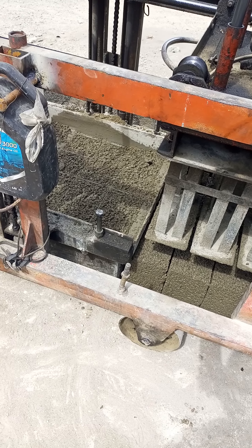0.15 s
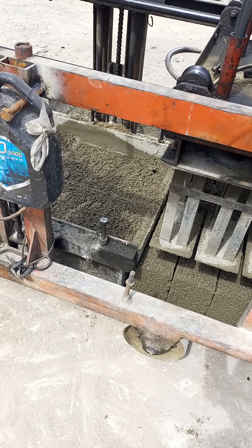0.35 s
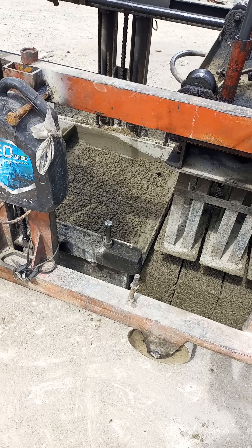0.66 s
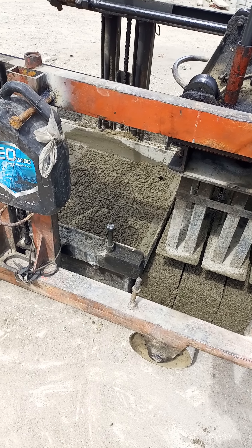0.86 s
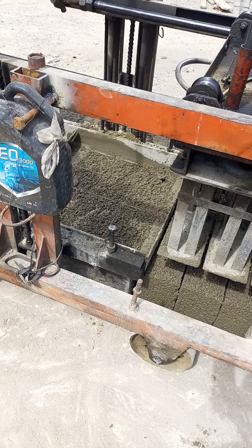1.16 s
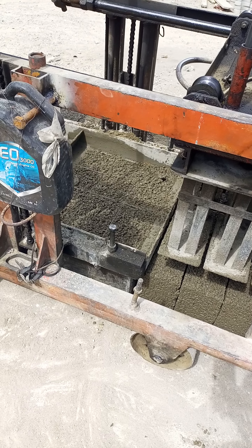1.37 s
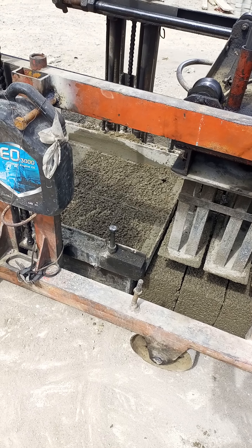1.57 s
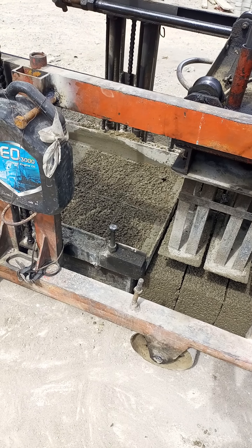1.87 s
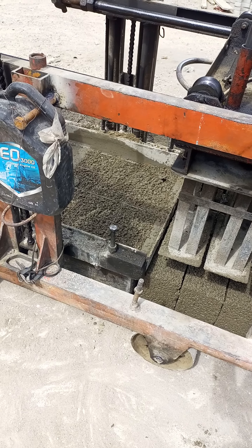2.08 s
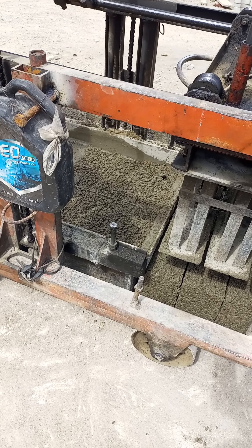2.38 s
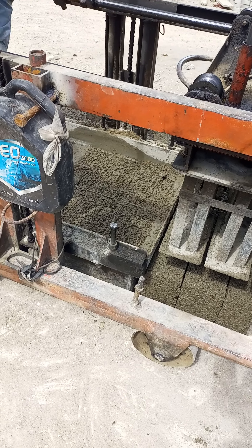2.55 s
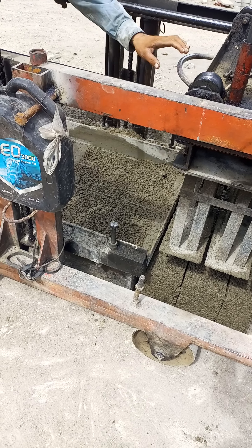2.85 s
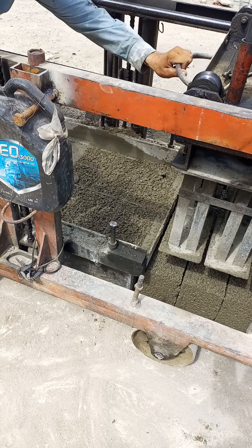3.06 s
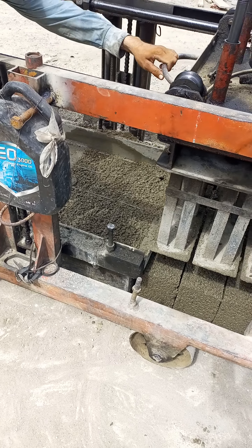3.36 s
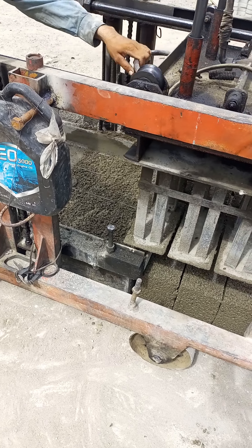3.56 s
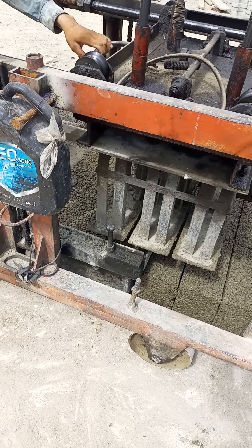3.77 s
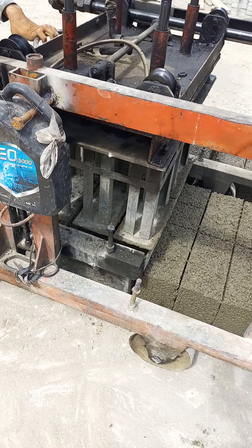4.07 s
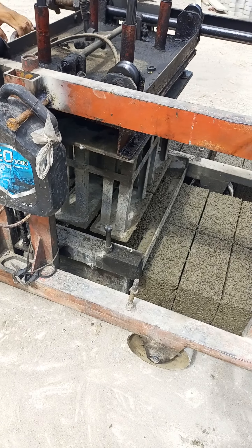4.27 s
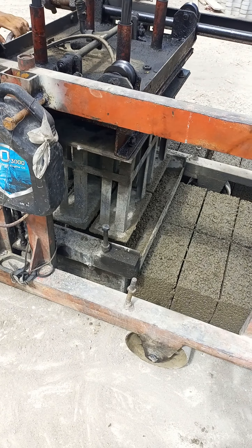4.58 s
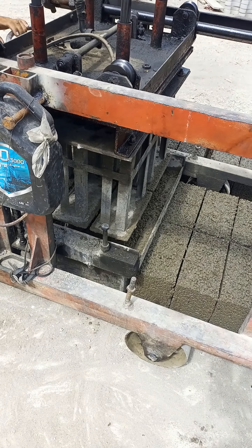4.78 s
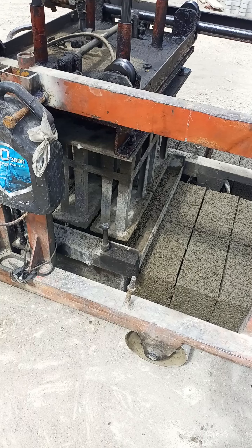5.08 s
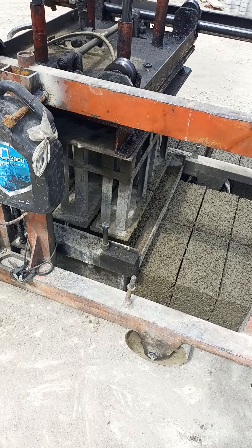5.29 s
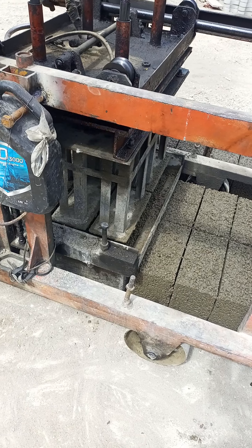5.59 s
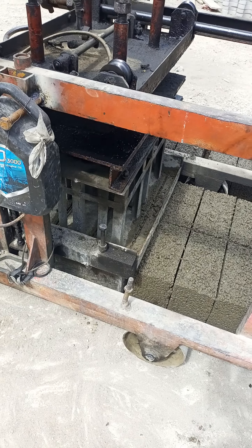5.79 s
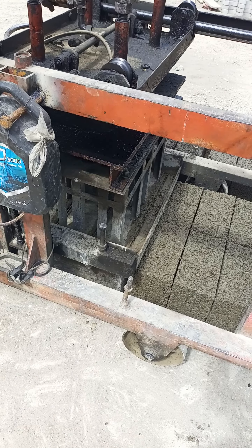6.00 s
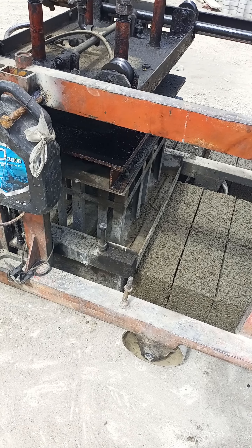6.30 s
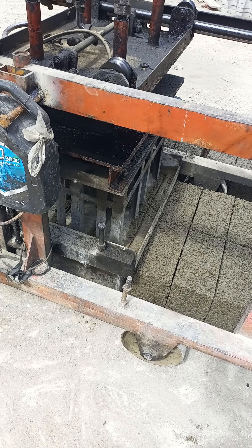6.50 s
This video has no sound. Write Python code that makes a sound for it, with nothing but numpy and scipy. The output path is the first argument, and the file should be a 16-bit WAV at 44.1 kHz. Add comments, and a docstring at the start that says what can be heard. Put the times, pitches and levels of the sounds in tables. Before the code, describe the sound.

A small engine putters and clatters nearby in the open air while a shovel strikes a steel mould and shoves wet, gravelly concrete around. A few sharp clanks follow, then a stretch of plain idling and a quick clatter of heavy steel. Near the end the engine races and the whole block machine vibrates, droning and rattling loudly. A heavy tamper lands with a thud and a clang, and the shaking continues, a little damped.

```python
"""A single-cylinder engine idles on a concrete block machine outdoors: exhaust puffs, valve gear clacks.
A shovel knocks and pushes wet mix into the ringing steel mould; the tamper head is freed and rolled over.
The throttle opens, a belt-driven vibrator shakes the whole frame, and the head drops onto the mix,
damping the shaking. Most sounds are modelled as source and filter: a force or a gas pulse excites
the resonances of a steel part or of the exhaust."""
import sys
import numpy as np
from scipy import signal
from scipy.fft import rfft, irfft
from scipy.io import wavfile

SR = 44100
rng = np.random.default_rng(int(sys.argv[2]) if len(sys.argv) > 2 else 0)


def wav_record(signal):
    """Record a signal, one row per channel, as 16-bit PCM in the file named by sys.argv[1]."""
    frames = np.transpose(np.atleast_2d(signal))
    bounded = np.clip(frames, -1, 1)
    # unit amplitude maps onto the largest positive 16-bit level
    quanta = np.round(bounded * 32767).astype(np.int16)
    wavfile.write(sys.argv[1], SR, quanta)


N = 292824
TIME = np.arange(N) / SR

# Spectra give relative power density; their modes add resonance peaks.
# drifting idle: t/s, firing rate/Hz
IDLE_RATE = [(0, 11.586), (1.45, 12.083), (1.9, 11.46), (3.2, 11.836), (4.8, 11.697)]
# vibrator's drag as the belt grips, then as the head drops onto the mix: t/s, build-up/s, firing rate lost/Hz
VIBRATOR_DRAG = [(4.9395, .3727, 10.89), (5.383, .44, 7.646)]
# a puff at the firing and a weaker one later: phase/cycles, level/dB, decay/cycles
EXHAUST_PUFFS = [(0.98, -4.5, 0.014), (0.1, -12, 0.085)]
# exhaust spectrum: f/Hz, level/dB
EXHAUST_SPECTRUM = [(25, -67), (50, -27), (110, 2), (220, -3.5), (300, -10.5), (500, -67)]
# clacks of piston and valve gear: phase/cycles, level/dB, decay/cycles
VALVE_CLACKS = [(0.018, -8, 0.21), (.28, -10, 0.18), (.39, -10, 0.26), (0.579, -17, 0.061)]
# valve gear spectrum: f/Hz, level/dB
GEAR_SPECTRUM = [(250, -25), (560, -9), (830, -18), (1390, -4), (1720, -9.5), (2500, -4.5), (4400, -7.5),
                 (7400, -24.5), (10000, -14.5), (12000, -30)]
# engine block resonances: f/Hz, width/Hz, level/dB
BLOCK_MODES = [(1396, 63, 3.5), (2260, 370, 2.5)]
# pings of the engine covers: f/Hz, width/Hz, level/dB
COVER_MODES = [(2565, 51, -50), (3484, 120, -53.5), (4326, 38, -58.5)]
# open-air background: f/Hz, level/dB
YARD_SPECTRUM = [(25, -14), (80, -43), (400, -6.5), (3000, -12.5), (16000, -23.5)]

# shovel blade on the mould: t/s, level/dB, contact/s, main ring f/Hz, its lift/dB
SHOVEL_KNOCKS = [(.5395, -21, 0.0043, 1010, 7.5), (.553, -30.5, 0.0084, 506, 11),
                 (.787, -28.5, 0.0083, 4400, 14), (1.2195, -25.5, 0.0039, 1570, 19),
                 (1.222, -21.5, 0.002, 5200, 15), (1.883, -24.5, 0.01, 2790, 1),
                 (1.9075, -16, 0.0038, 2280, -1.5), (2.296, -30.5, 0.011, 5260, 24),
                 (2.319, -26.5, 0.0064, 3300, 12)]
# steel struck through wet mix: f/Hz, level/dB
SHOVEL_SPECTRUM = [(40, -48), (100, -27), (340, 9), (700, 3), (1200, -6.5), (2300, -2), (3800, -5.5),
                   (6300, -10.5), (8000, -15.5), (13000, -30)]
# blade resonances: f/Hz, width/Hz, level/dB
SHOVEL_MODES = [(354, 64, -2), (875, 290, 14.5), (1460, 140, 13.5), (2180, 195, 19.5), (2535, 270, 16),
                (3230, 91, 8.5), (4510, 170, 10), (4990, 51, 11), (5320, 240, 5.5), (6230, 130, 5.5)]
# mix moved by shovel or head: t/s, length/s, thud level/dB, thud f/Hz, its lift/dB, T60/s, scrape level/dB
MIX_PUSHES = [(0.682, 0.073, -46.5, 460, 10, 0.4, -48.5), (0.782, 0.051, -31, 217, 14, 0.28, -44),
              (1.381, 0.074, -45.5, 820, 24, .15, -52), (1.499, 0.089, -36, 300, 9, 0.15, -46),
              (2.196, 0.082, -25.5, 223, 3, 0.35, -33), (2.296, 0.0078, -26.5, 680, 6, 0.29, -22),
              (4.292, 0.056, -28.5, 244, 12.5, 0.35, -54), (5.743, 0.015, -21.5, 244, 12, 0.21, -48)]
# thud of the mix: f/Hz, level/dB
THUD_SPECTRUM = [(40, -34), (90, -7.5), (200, 1), (850, -4), (1200, -22.5), (6000, -66)]
# scrape of its gravel: f/Hz, level/dB
GRAVEL_SPECTRUM = [(300, -11), (1000, -4.5), (6500, -4.5), (8000, -14.5), (10300, -15), (12500, -26)]
# ringing of the mould's walls: t/s, f/Hz, level/dB, T60 before smothering/s
WALL_RINGS = [(1.596, 567, -20.5, 0.13), (1.596, 432, -39.5, 0.99), (2.609, 434, -33.5, 1),
              (2.891, 438, -45, 1), (5.752, 680, -20.5, 0.22)]
# clanks of the head's catch: t/s, level/dB, contact/s, main ring f/Hz, its lift/dB
CATCH_CLANKS = [(2.6065, -19.5, 0.0071, 560, -5), (2.7425, -21.5, 0.002, 2840, 9.5),
                (2.8905, -28.5, 0.0066, 2880, 18)]
# spectrum of the catch: f/Hz, level/dB
CATCH_SPECTRUM = [(50, -44), (200, -10.5), (450, -7), (900, -5.5), (1150, -10), (2700, -5.5), (6000, -22),
                  (8000, -37), (16000, -40)]
# its resonances: f/Hz, width/Hz, level/dB
CATCH_RESONANCES = [(572, 54, 12.5), (2400, 200, 1.5), (2700, 220, 4), (3700, 74, 3), (4250, 87, 2.5),
                    (4670, 90, 0.5), (5800, 160, -5)]
# tamper head on the frame, and at 4.826 s a brief chatter of the throttle lever: t/s, level/dB, contact/s, main
# ring f/Hz, its lift/dB
HEAD_BLOWS = [(4.287, -27.5, 0.011, 2300, 8), (4.301, -25.5, 0.02, 1590, 16), (4.324, -23, 0.018, 2050, 9),
              (4.356, -25, 0.017, 1650, 10), (4.427, -24.5, 0.0034, 2170, 10),
              (4.826, -37.5, 0.048, 2880, 3), (5.742, -20.5, 0.031, 2103, 2)]
# spectrum of the steel frame: f/Hz, level/dB
FRAME_SPECTRUM = [(400, -32), (950, -5), (1300, -0.5), (1600, -4.5), (2000, 0.5), (6500, -3), (7700, -13.5),
                  (9900, -16), (12500, -32)]
# its resonances: f/Hz, width/Hz, level/dB
FRAME_MODES = [(1853, 18, -1), (2290, 110, -13), (2580, 180, -3.5), (2903, 61, -6), (3243, 140, -8)]

# crack of a firing under throttle: f/Hz, level/dB
CRACK_SPECTRUM = [(400, -64), (2000, -37), (6000, 3), (9500, 13.5), (12000, 3.5)]
# silencer resonance: f/Hz, width/Hz, level/dB
SILENCER_MODES = [(105.5, 1.4, 18)]
# exhaust under load: f/Hz, level/dB
BARK_SPECTRUM = [(50, -33.5), (190, 9.5), (420, 0.5), (1200, -23)]
# the belt slips more at speed: t/s, turns of the vibrator's weight per firing
BELT_RATIO = [(5.9, 2.65), (6.4, 2.618)]
# hum of the shaken machine: harmonic of the vibrator's rate, level/dB
HUM_HARMONICS = [(1, -3), (2, -0.5), (3, 8), (16, -1)]
# spectrum of the filled mould: f/Hz, level/dB
MOULD_SPECTRUM = [(45, -25.5), (75, -8), (130, -2), (200, -0.5), (330, -8.5), (560, -1.5), (800, 0.5),
                  (1200, -5.5), (2000, -12)]
# its resonances: f/Hz, width/Hz, level/dB
MOULD_MODES = [(232, 21, 1.5), (393, 70, -1), (552, 42, 3)]
# loose fittings: f/Hz, width/Hz, level/dB, firing rate that shakes each most/Hz
FITTING_MODES = [(5190, 90, -45.5, 19.5), (5890, 96, -43.5, 19), (3225, 85, -25.5, 41),
                 (2556, 76, -27, 41.5), (4090, 170, -30, 37.6), (4950, 39, -34.5, 38.5),
                 (5750, 16, -33, 43), (6200, 120, -31.5, 34.6)]
# microphone's dips and airy peak: f/Hz, half width/Hz, gain/dB
MICROPHONE_BANDS = [(3780, 97, -4.5), (7970, 950, -2), (12900, 2100, -2), (15350, 650, 7.5)]

THROTTLE_S, REV_GAIN_HZ, REV_LAG_S = 4.835, 63.59, 1.378  # opening; unloaded gain in firing rate; lag
REFERENCE_HZ = 16  # firing rate from which level changes per octave are counted
LANDING_S, SETTLE_S, DAMPING_DB = 5.824, 0.24, -4  # the head settles on the mix and damps the shaking


def amp(db):
    """Amplitude ratio of a level in decibels."""
    return 10 ** (np.asarray(db) / 20)


def unit(x):
    """Normalisation to rms 1."""
    return x / np.sqrt(np.mean(x ** 2) + 1e-20)


def curve(rows, at=TIME):
    """Linear interpolation in a two-column table."""
    return np.interp(at, *np.transpose(rows))


def ramp(start_s, length_s):
    """Linear rise from 0 to 1."""
    return np.clip((TIME - start_s) / length_s, 0, 1)


def wander(rate_hz, size=N):
    """Smooth random modulation of rms about 1."""
    return np.interp(np.arange(size) / SR * rate_hz, np.arange(4096), rng.standard_normal(4096))


def grains(spread_db):
    """Contact noise: a dense rain of tiny impacts of unequal size."""
    noise = rng.standard_normal(N)
    sizes = np.clip(rng.standard_normal(N // 16 + 1), -2, 2)
    return unit(noise * amp(spread_db * np.repeat(sizes, 16)[:N]))


def body(spectrum, modes=(), bed_db=0, lift=(1000, 0), size=8192):
    """Minimum-phase impulse response of energy 1: a broad bed, modal peaks and one lifted region."""
    hz = np.fft.rfftfreq(size, 1 / SR) + 1
    f, db = np.transpose(spectrum)
    power = amp(np.interp(np.log(hz), np.log(f), db) + bed_db) ** 2
    for centre, width, level in modes:
        power = power + amp(level) ** 2 / (1 + 2 * ((hz - centre) / width) ** 2) ** 2
    lift_db = lift[1] / (1 + (np.log(hz / lift[0]) / 0.14) ** 2)
    # towards the treble, small steel modes crowd together and ripple the response
    ripple = np.clip(rng.standard_normal(400), -1.7, 1.4)
    ripple_db = np.minimum(hz / 400, 5.8) * np.interp(np.sqrt(hz) * 2.6, np.arange(400), ripple)
    power = power * amp(lift_db + ripple_db) ** 2
    log_gain = np.log(np.r_[power, power[-2:0:-1]]) / 2
    response = np.fft.ifft(np.exp(np.conj(signal.hilbert(log_gain)))).real[:size // 2]
    return response / np.linalg.norm(response)


def through(x, response):
    """Linear filtering by convolution with an impulse response."""
    return signal.oaconvolve(x, response)[:len(x)]


def add(mix, start_s, sound):
    """Superposition of a sound on the mix."""
    part = mix[round(start_s * SR):][:len(sound)]
    part += sound[:len(part)]


def ring(force, hz, width):
    """Forced resonance: one steel mode driven by a noisy force, rms 1."""
    pole = np.exp((2j * np.pi * hz - 2 * np.pi * width) / SR)
    return unit(signal.lfilter([1], np.poly([pole, pole]), force * rng.standard_normal(N)).real)


def loose_parts(force, spectrum, modes=(), bed_db=0, count=3):
    """Energy sharing: loose parts take turns in catching the force, each with its own response."""
    shares = amp([9 * wander(16) for _ in range(count)])
    shares = shares / np.linalg.norm(shares, axis=0)
    return sum(through(force * share * grains(2.9), body(spectrum, modes, bed_db)) for share in shares)


def firing_rate():
    """First-order lag: the engine races up from idle against the vibrator's drag; rate in Hz."""
    rev = REV_GAIN_HZ * (1 - np.exp(-np.maximum(TIME - THROTTLE_S, 0) / REV_LAG_S))
    drag = sum(lost * ramp(start, length) for start, length, lost in VIBRATOR_DRAG)
    return curve(IDLE_RATE) + rev - drag


def engine(cycles):
    """Periodic excitation: each cycle puffs gas from the exhaust, clacks the gear and pings the covers."""
    firing = cycles.astype(int)
    count = firing[-1] + 1
    puff_scatter, gear_scatter = rng.standard_normal((count, 2))[firing].T
    puffs = sum(amp(db) * np.exp(-((cycles - at) % 1) / decay) for at, db, decay in EXHAUST_PUFFS)
    flow = (amp(-26.5) + puffs) * amp(2 * puff_scatter) * (rng.standard_normal(N) + 0.17)
    exhaust = through(flow, body(EXHAUST_SPECTRUM))
    slack = cycles + 0.011 * wander(40)  # play in the gear shifts each clack a little
    gear = amp(-13) + sum(amp(db + wander(16)) * np.exp(-((slack - at) % 1 / decay) ** 2)
                          for at, db, decay in VALVE_CLACKS)
    gear_force = gear * amp(0.5 * gear_scatter + 2 * wander(200))
    clatter = loose_parts(gear_force, GEAR_SPECTRUM, BLOCK_MODES, bed_db=3.5)
    pings = sum(amp(db) * ring(gear ** 2 * amp(1.7 * rng.standard_normal(count))[firing], hz, width)
                for hz, width, db in COVER_MODES)
    return amp(-54.5) * unit(exhaust) + amp(-42.5) * unit(clatter) + pings


def yard():
    """Stationary filtered noise: the faint open-air background."""
    return amp(-56) * through(rng.standard_normal(N), body(YARD_SPECTRUM))


def contact(length_s, t60, rise_s, spread_db, size=20000):
    """Chattering contact: a random force rises, holds and decays exponentially."""
    t = np.arange(size) / SR
    force = rng.standard_normal(size) * amp(spread_db * np.tanh(wander(868, size)))
    return unit(force) * np.minimum(t / rise_s, 1) * amp(-60 * np.maximum(t - length_s, 0) / t60)


def blows(rows, spectrum, modes, bed_db, t60, tail_db, tail_t60, spots=4, strike_s=0.00198):
    """Impact of steel on steel: strike, chatter, faint rattle; the place struck favours certain modes."""
    out = np.zeros(N)
    for start, db, length, hz, lift_db in rows:
        chatter = contact(length, t60, rise_s=0.00023, spread_db=1.5)
        rattle = contact(length, tail_t60, rise_s=0.00023, spread_db=1.5)
        force = chatter + amp(tail_db) * rattle
        high_spots = (rng.random(spots) * strike_s * SR).astype(int)  # the edge lands on these first
        force[high_spots] += amp(11.5) * rng.choice([-1, 1], spots)
        add(out, start, amp(db) * through(force, body(spectrum, modes, bed_db, (hz, lift_db))))
    return out


def shovel():
    """Impacts on the mould excite the modes of the blade."""
    return blows(SHOVEL_KNOCKS, SHOVEL_SPECTRUM, SHOVEL_MODES,
                 bed_db=8, t60=0.032, tail_db=-10, tail_t60=0.26)


def wet_mix():
    """Damped impact and friction: heavy mix thuds in the mould as its gravel scrapes the steel."""
    out, gravel = np.zeros(N), body(GRAVEL_SPECTRUM)
    for start, length, thud_db, hz, lift_db, t60, scrape_db in MIX_PUSHES:
        push = contact(length, t60, rise_s=0.017, spread_db=5.5)
        scrape = contact(length, t60 / 2, rise_s=0.0017, spread_db=3)
        thud = through(push, body(THUD_SPECTRUM, lift=(hz, lift_db)))
        add(out, start, amp(thud_db) * thud + amp(scrape_db) * through(scrape, gravel))
    return out


def mould_walls(rise_s=0.0044, smothered_s=0.26):
    """Free vibration: struck walls ring on unsteadily until the settling mix smothers them."""
    out, t = np.zeros(N), np.arange(SR) / SR
    envelope = np.minimum(t / rise_s, 1) * np.maximum(1 - (t / smothered_s) ** 4, 0)
    for start, hz, db, t60 in WALL_RINGS:
        waver = wander(74.5, SR)
        tone = np.sin(2 * np.pi * hz * t + 0.67 * waver)
        add(out, start, amp(db - 60 * t / t60 + 2 * waver) * envelope * tone)
    return out


def head_catch():
    """Impacts excite the modes of the catch as the head is freed."""
    return blows(CATCH_CLANKS, CATCH_SPECTRUM, CATCH_RESONANCES,
                 bed_db=1.5, t60=0.1, tail_db=-10, tail_t60=0.13)


def tamper_head():
    """Impacts of the rolling, then dropping, head, and a brief chatter of the throttle lever, excite the modes
    of the frame."""
    return blows(HEAD_BLOWS, FRAME_SPECTRUM, FRAME_MODES, bed_db=-8, t60=0.088, tail_db=-6, tail_t60=0.21)


def throttle(cycles, rate, crack_s=0.0017, crack_delay_s=0.00094, thump_s=0.0032):
    """Pressure pulses: with more fuel each firing cracks and drives a slug of gas through the silencer."""
    octaves = np.log2(rate / REFERENCE_HZ)
    since_s = ((cycles + 0.5) % 1 - 0.5) / rate  # from the nearest firing
    pulse = np.exp(-((since_s - crack_delay_s) / crack_s) ** 2)
    fizz = amp(-31.5 + 10.5 * octaves)  # fills the gaps as the engine races
    crack_db = -23.5 - 2.5 * octaves + 2 * wander(120)
    crack = loose_parts(amp(crack_db) * (pulse + fizz), CRACK_SPECTRUM)
    thump = through(np.exp(-(since_s / thump_s) ** 2), body(EXHAUST_SPECTRUM, SILENCER_MODES))
    return ramp(THROTTLE_S, 0.0034) * (crack + amp(-47 - 8.5 * octaves) * unit(thump))


def shaking_db(rate, level_db, db_per_octave, full_s, build_db_per_s):
    """Level of forced vibration: it builds as the belt grips, follows speed and is damped by the head."""
    build_up_db = build_db_per_s * np.minimum(TIME - full_s, 0)
    speed_db = db_per_octave * np.log2(rate / REFERENCE_HZ)
    return level_db + build_up_db + speed_db + DAMPING_DB * ramp(LANDING_S, SETTLE_S)


def exhaust_bark(cycles, rate, decay_s=0.0087):
    """Pulsed flow noise: under load each firing is a heavy, breathy thump."""
    puff = np.exp(-(cycles % 1) / rate / decay_s) * (rng.standard_normal(N) + 0.25)
    bark = unit(through(puff / np.sqrt(rate), body(BARK_SPECTRUM)))
    level_db = shaking_db(rate, level_db=-32, db_per_octave=-6.5, full_s=5.39, build_db_per_s=40)
    return ramp(THROTTLE_S, 0.42) * amp(level_db) * bark


def vibrator(cycles, rate, slam_decay_turns=0.31):
    """Rotating unbalance: a belt-driven weight slams the mould once a turn and rattles the frame."""
    turns = np.cumsum(rate * curve(BELT_RATIO)) / SR
    slam = amp(1) + np.exp(-(turns % 1) / slam_decay_turns)  # some rattle persists between slams
    throb = unit(slam * amp(1.27 * wander(100)))
    rattle_db = shaking_db(rate, level_db=-28, db_per_octave=9.5, full_s=5.425, build_db_per_s=34)
    rattle = loose_parts(amp(rattle_db) * throb, FRAME_SPECTRUM, FRAME_MODES, bed_db=-6.5, count=2)
    grip = ramp(THROTTLE_S, 0.22)
    return grip * (rattle + fittings(throb, rate) + mould_hum(cycles, turns, throb, rate))


def fittings(throb, rate, swell_db=3, span_octaves=0.26):
    """Resonance: each loose fitting rings in swells as the speed passes the one that shakes it most."""
    out = np.zeros(N)
    for hz, width, db, best_rate in FITTING_MODES:
        nearness = np.exp(-(np.log2(rate / best_rate) / span_octaves) ** 2)
        out += amp(db) * nearness * ring(throb * amp(swell_db * wander(14)), hz, width)
    return out


def harmonics(turns, orders, levels_db, swell_db=3, jitter_turns=0.0053):
    """Harmonic series of a rotation: each partial swells alone; phase jitter roughens the higher ones."""
    return sum(amp(db + swell_db * wander(10))
               * np.cos(2 * np.pi * (k * turns + rng.random() + k * jitter_turns * wander(50)))
               for k, db in zip(orders, levels_db))


def mould_hum(cycles, turns, throb, rate, engine_db=1.5, dull_hz=450):
    """Forced vibration: harmonics of weight and engine swell as they climb through the mould's modes."""
    orders = np.arange(1, 21)
    drone = harmonics(turns, orders, curve(HUM_HARMONICS, orders))
    drone += harmonics(cycles, orders, np.full(len(orders), engine_db))
    walls = body(MOULD_SPECTRUM, MOULD_MODES)
    rumble = through(throb ** 3 * grains(0.81), walls)
    hum = amp(-2.5) * unit(through(drone, walls)) + amp(-5.5) * unit(rumble)
    hum_db = shaking_db(rate, level_db=-33, db_per_octave=8.5, full_s=5.228, build_db_per_s=59)
    # gentle shaking is dull; the upper harmonics come once the mould starts to hammer
    dull = signal.sosfiltfilt(signal.butter(2, dull_hz, fs=SR, output="sos"), hum)
    hammering = np.clip((hum_db + 34.5) / 6, 0, 1)
    return amp(hum_db) * (dull + hammering * (hum - dull))


def scene():
    """Superposition of all sources in mono; the engine's phase is the integral of its firing rate."""
    rate = firing_rate()
    cycles = np.cumsum(rate) / SR + 0.107
    machine = engine(cycles) + throttle(cycles, rate) + exhaust_bark(cycles, rate) + vibrator(cycles, rate)
    return (machine + shovel() + head_catch() + tamper_head() + wet_mix() + mould_walls() + yard())[None]


def record(dry, edge_hz=15880):
    """Frequency response: the microphone's colour, then a low-pass band limit."""
    hz = np.fft.rfftfreq(N, 1 / SR)
    colour_db = sum(db * np.exp(-((hz - centre) / width) ** 2) for centre, width, db in MICROPHONE_BANDS)
    low_pass = signal.firwin(511, edge_hz, window=("kaiser", 9), fs=SR)
    return signal.oaconvolve(irfft(rfft(dry) * amp(colour_db), N), low_pass[None], "same")


dry = scene()
out = record(dry)
wav_record(out)
```